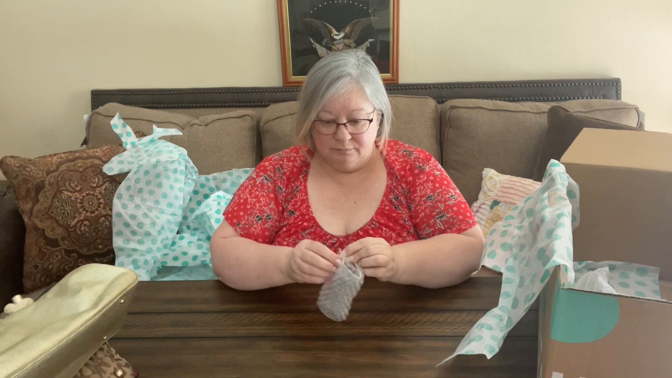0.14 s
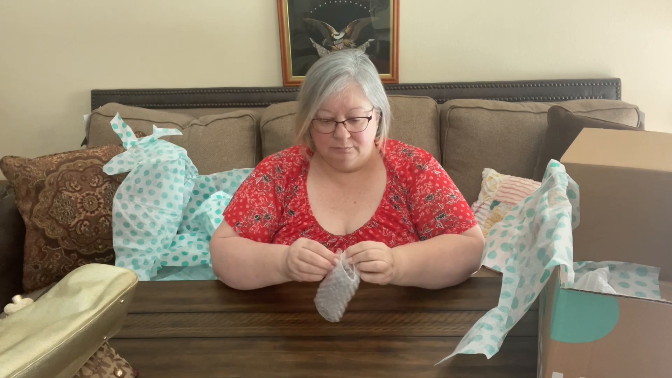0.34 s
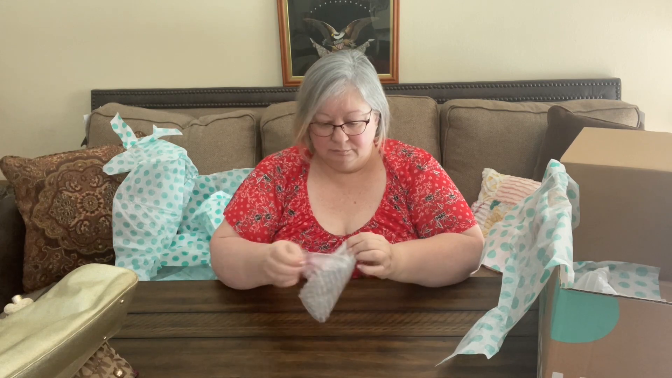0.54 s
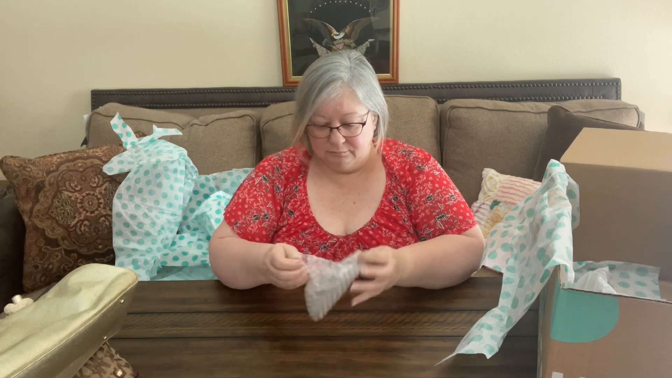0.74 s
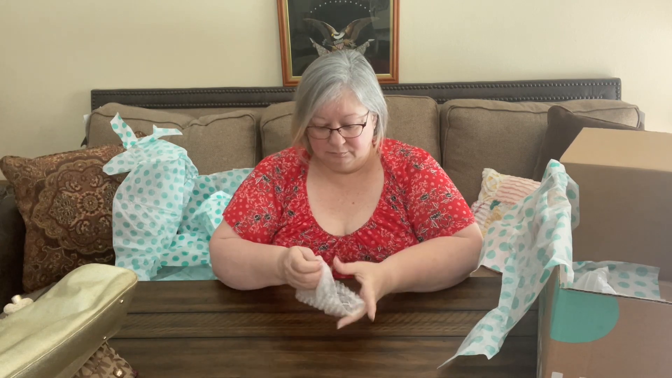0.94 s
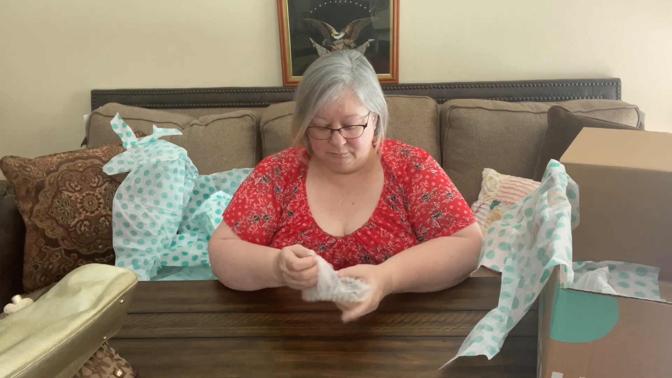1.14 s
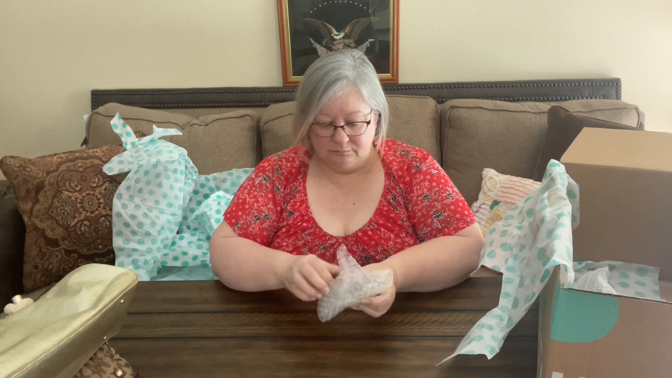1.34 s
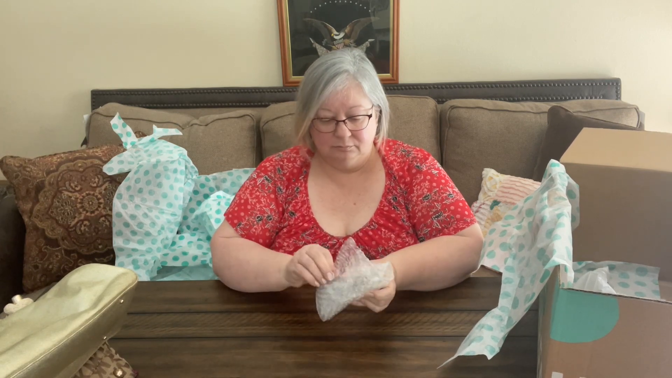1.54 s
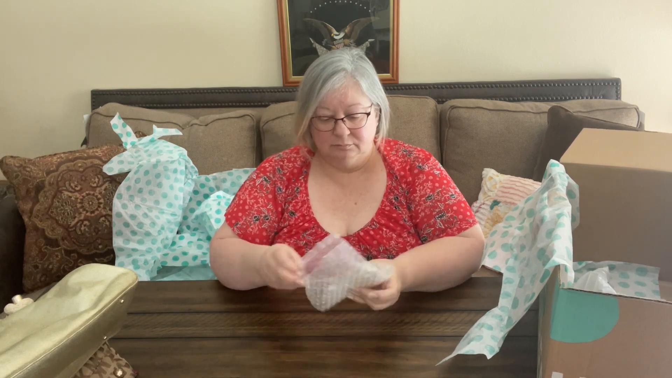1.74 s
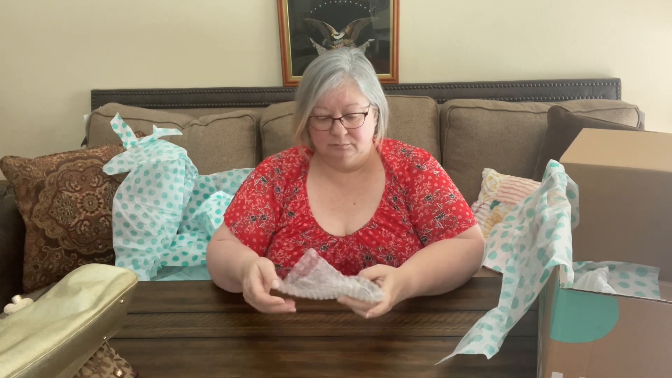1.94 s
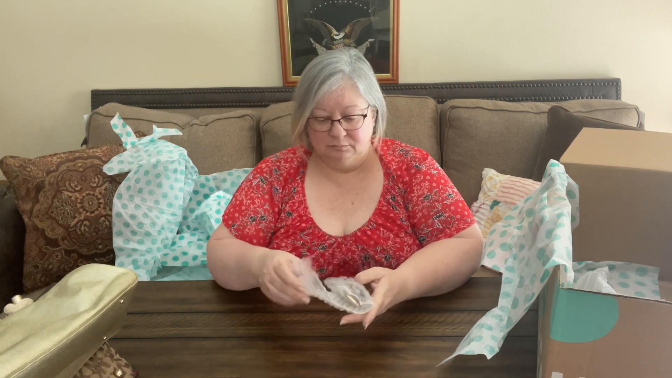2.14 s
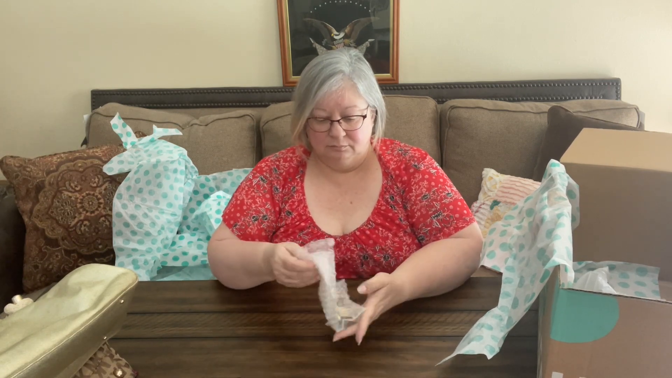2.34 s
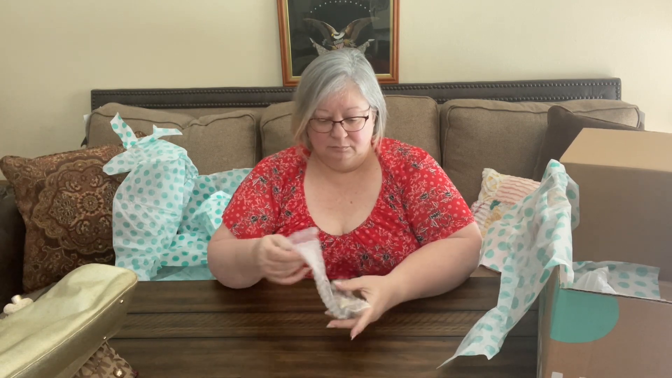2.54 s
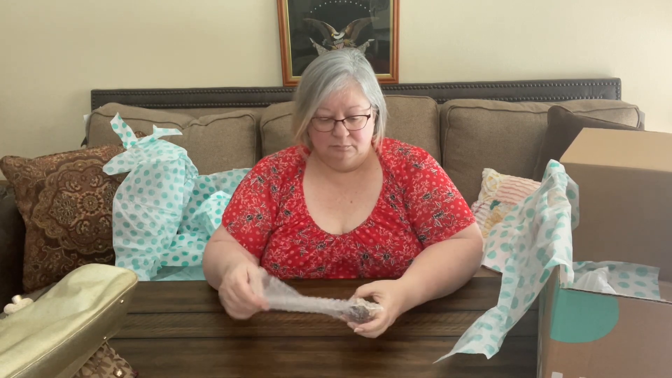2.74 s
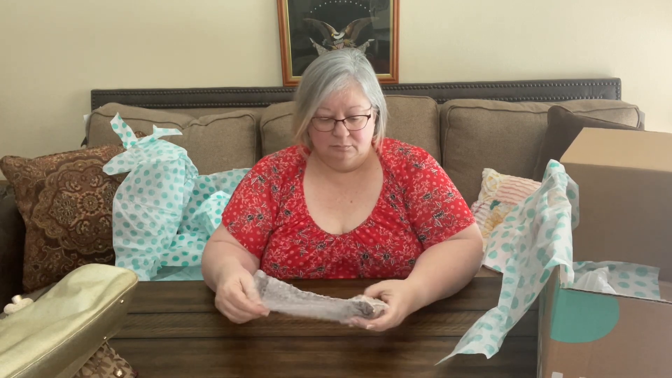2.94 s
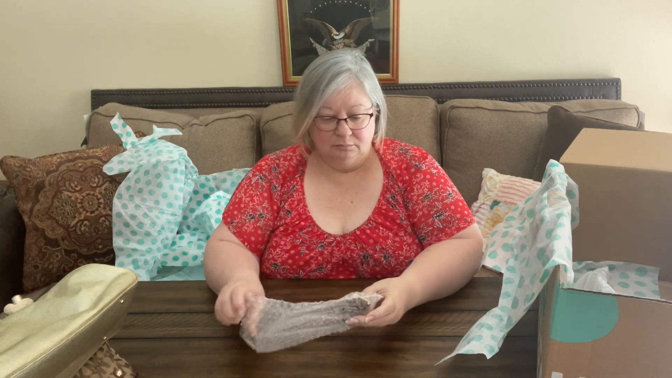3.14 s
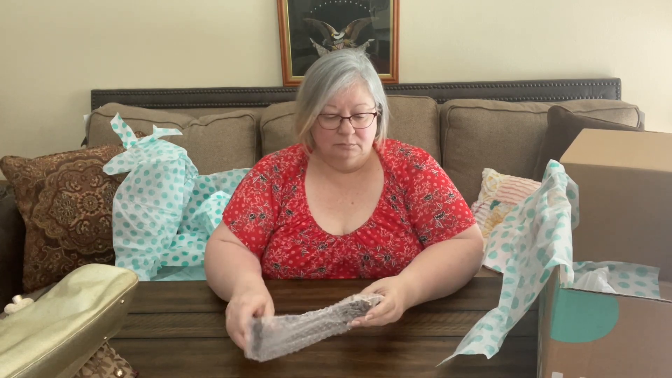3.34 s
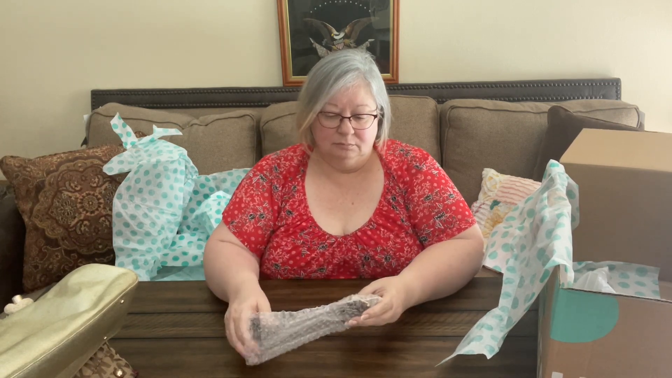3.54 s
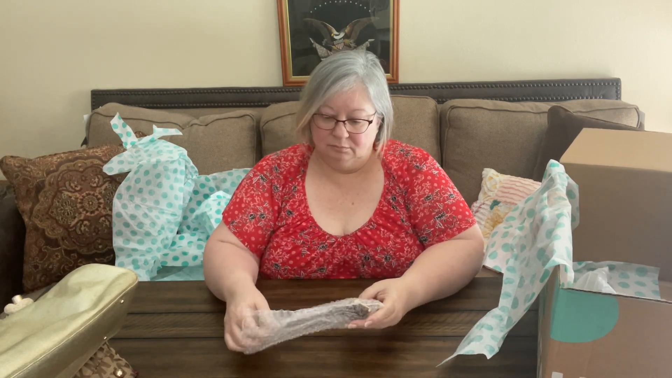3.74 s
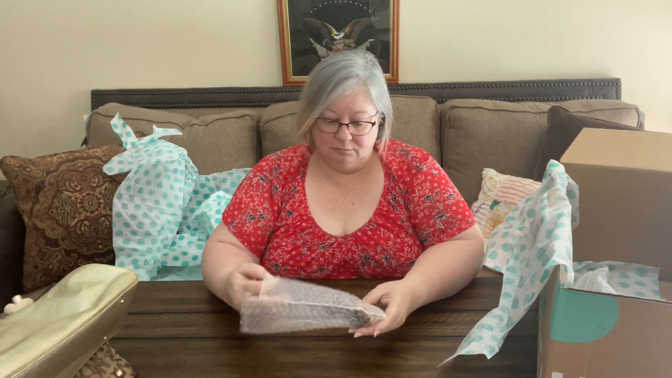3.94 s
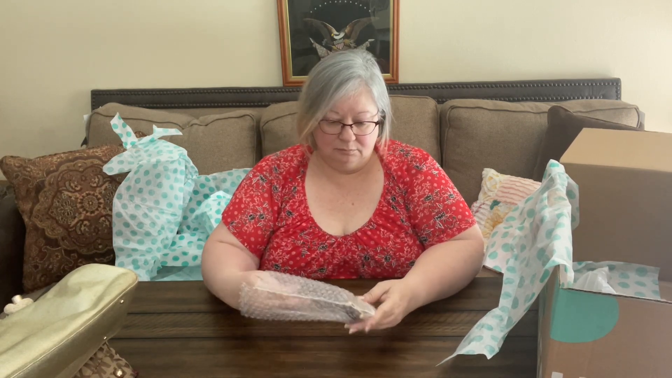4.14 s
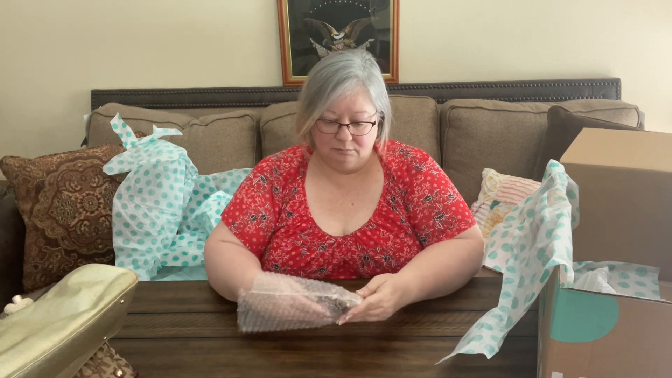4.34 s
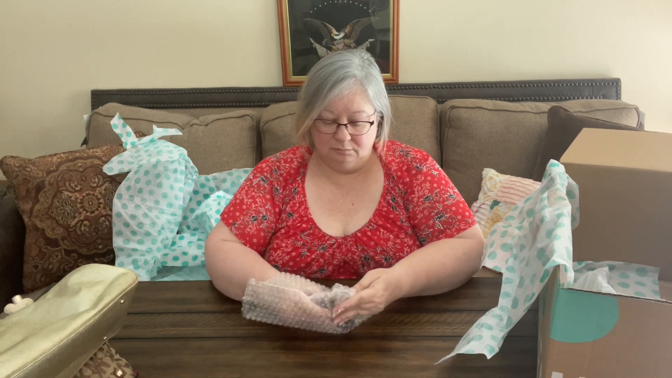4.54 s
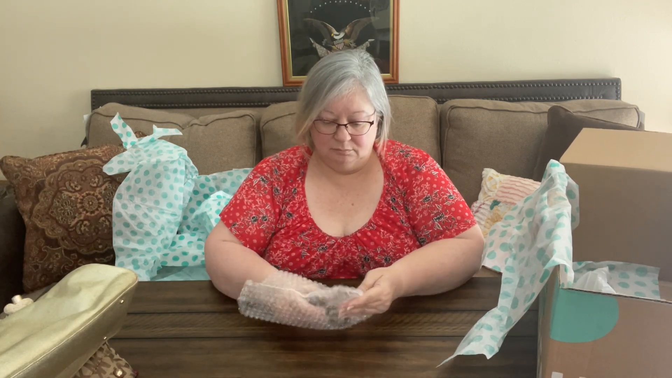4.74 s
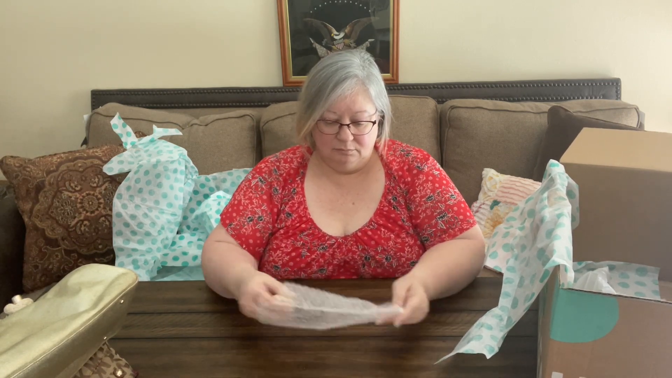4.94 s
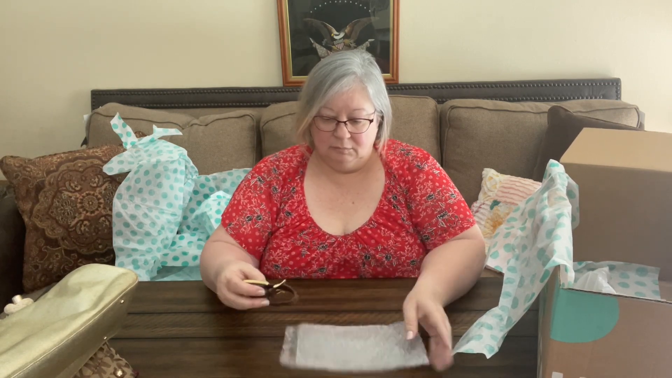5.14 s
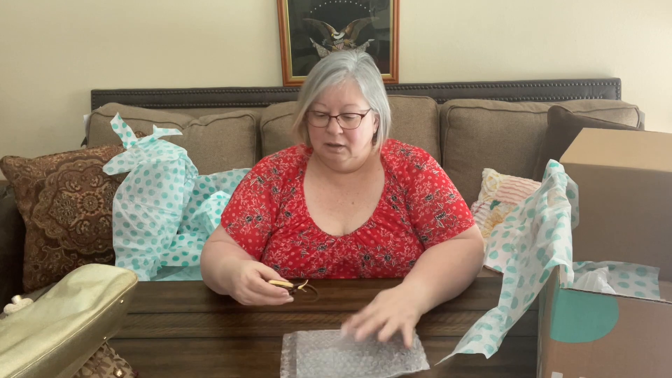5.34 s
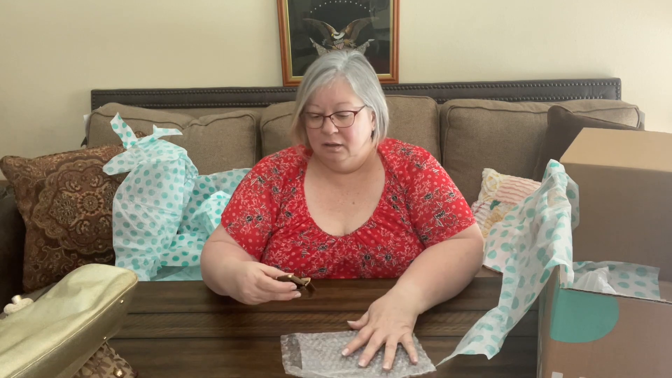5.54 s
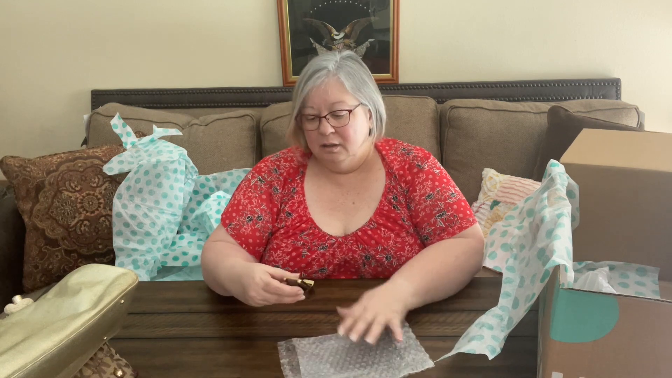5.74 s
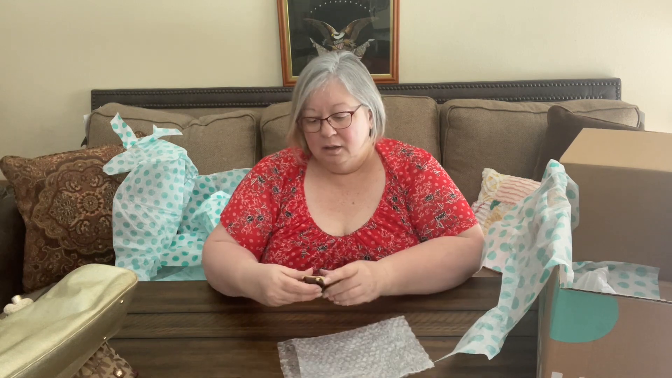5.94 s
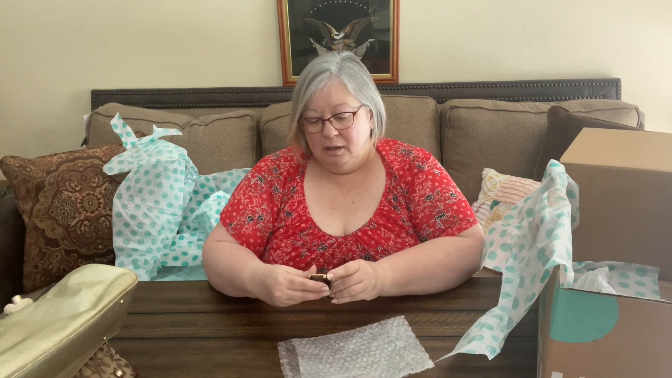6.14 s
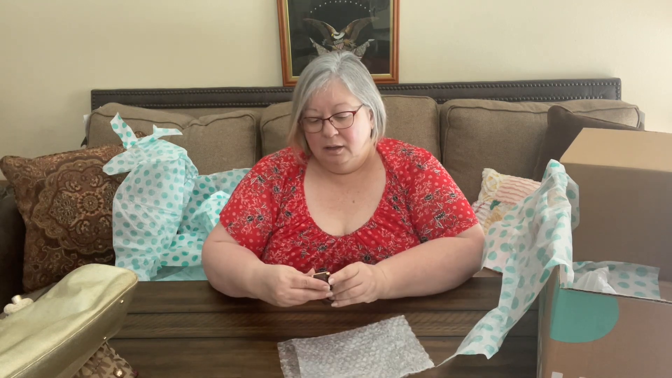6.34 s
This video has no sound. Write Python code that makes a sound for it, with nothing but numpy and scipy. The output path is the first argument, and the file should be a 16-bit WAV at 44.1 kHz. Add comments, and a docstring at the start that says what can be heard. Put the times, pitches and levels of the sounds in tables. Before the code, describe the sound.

Bubble wrap crinkles and crackles busily in hands, with sharp early snaps, then is slapped flat on a wooden table and falls quiet.

```python
"""A small bubble-wrap pouch is pulled open, crinkled and patted flat by hands on a wooden table in a furnished room.
Creases in the film buckle as dense tiny clicks, each ringing a short resonance; lone creases pop across the band.
Larger folds snap as click sprays that ring the air pockets; the pat rings modes of table top and trapped air.
Two close microphone ports hear a common sound and reflections of their own over a faint mains hum, made as
narrow bands of noise, and a faint hiss of coloured noise."""
import sys
import numpy as np
from scipy import signal
from scipy.fft import rfft, irfft, next_fast_len
from scipy.io import wavfile
from scipy.ndimage import uniform_filter1d

SR = 44100
rng = np.random.default_rng(int(sys.argv[2]) if len(sys.argv) > 2 else 0)


def generate_wav(signal):
    """Clip the signal to [-1, 1] and save it as 16-bit WAV at the path in sys.argv[1]."""
    frames = np.transpose(np.atleast_2d(signal))
    scaled = np.clip(frames, -1, 1) * 32767
    pcm = np.round(scaled).astype(np.int16)
    wavfile.write(sys.argv[1], SR, pcm)


N = 286120
SIZE = next_fast_len(N + SR)   # FFT length, with room for the echoes
HZ = np.maximum(np.arange(SIZE // 2 + 1) * SR / SIZE, 1)


def crinkle():
    """Buckling: fine creases crackle and sizzle, wide folds rustle lower; a firmer grip makes the grain coarser."""
    # Spectra of the fine crackle, its sizzling top and the wide folds.
    # Each row: frequency in Hz, relative density in dB per Hz.
    film_spectrum = [(530, -26.5), (900, -8.5), (2400, -1), (2830, -4), (4370, -1), (5830, -7.5),
                     (9000, -24), (11700, -22.5), (19800, -120)]
    sizzle_spectrum = [(4000, -17.5), (7000, -0.5), (9000, -2.5), (12000, -6), (16000, -10.5)]
    folds_spectrum = [(71, -18.5), (120, -9.5), (178, -8.5), (433, 0), (485, -1), (543, -2), (841, -5.5),
                      (1080, -5), (3500, -11.5), (4550, -37), (7700, -120)]
    slap_s, settling_grip = 5.3, .55   # once slapped flat the sheet settles with a fine grain

    film_gain, folds_gain, sizzle_gain = handling()
    grip = np.clip((20 * np.log10(film_gain) + 71) / 25, .2, 1)
    grip = np.where(np.arange(N) / SR < slap_s, grip, settling_grip)
    jerks = from_db(0.2 * grip * drift(26))   # the whole sheet gives way in small jerks
    film = creases(film_spectrum, per_s=6000, spread_db=3.2 * grip, clump_db=1.5, clump_hz=40, cycles=2.5)
    sizzle = creases(sizzle_spectrum, per_s=19000, spread_db=3.2 * grip,
                     clump_db=1.5, clump_hz=25.2, cycles=16.0, count=5)
    folds = creases(folds_spectrum, per_s=800, spread_db=1.3 * grip, clump_db=0.5, clump_hz=29.0, cycles=5.6)
    crackle = film_gain * (film + grip * ticks())
    return jerks * (crackle + sizzle_gain * sizzle + folds_gain * folds)


def handling():
    """Addition of power: squeezes rise, hold and let go over the resting rustle; gains of crackle, folds, sizzle."""
    # Pulls and squeezes of the wrap. Each row: time at full strength in seconds, hold in seconds,
    # film crackle in dB, fold rustle in dB relative to the crackle.
    squeezes = [(-0.007, 0.13, -55.5, -7), (0.114, 0.13, -52.5, -3.5), (0.289, 0.015, -53.5, -13),
                (0.413, 0.041, -47.5, -24), (0.466, 0.011, -44, 1.5), (0.508, 0.01, -39.5, 6),
                (0.549, 0.011, -37, -3), (0.628, 0.058, -62, 10.5), (0.779, 0.11, -49.5, -4),
                (0.962, 0.029, -52, -4.5), (1.03, 0.052, -58, 0.5), (1.105, 0.13, -48.5, -4),
                (1.314, 0.025, -51.5, -2.5), (1.391, 0.019, -50.5, -10), (1.449, 0.019, -49, -6),
                (1.529, 0.11, -43, 0.5), (1.628, 0.011, -45, 5.5), (1.696, 0.026, -49.5, -3),
                (1.763, 0.037, -45.5, -5.5), (1.848, 0.042, -50, -1.5), (2.15, 0.023, -47, -6.5),
                (2.222, 0.028, -50.5, -3.5), (2.295, 0.015, -45, -5), (2.395, 0.013, -54, -3.5),
                (2.56, 0.16, -51, -9), (2.645, 0.13, -51, -2.5), (2.893, 0.057, -47.5, -4.5),
                (3.017, 0.041, -54, 1), (3.207, 0.016, -52.5, -7), (3.295, 0.023, -57, -5.5),
                (3.402, 0.016, -60.5, 6.5), (3.493, 0.0069, -52, -5), (3.55, 0.016, -61.5, 4),
                (3.625, 0.081, -52, -3.5), (3.748, 0.039, -51.5, -15), (3.854, 0.13, -45, -2.5),
                (4.09, 0.015, -52, 1.5), (4.218, .02, -53.5, -12), (4.278, 0.12, -46, -4),
                (4.463, 0.087, -48, 3), (4.665, 0.056, -59, 3), (4.741, 0.12, -45, -8.5),
                (4.916, 0.055, -53.5, -7.5), (5.036, 0.047, -53, -20), (5.156, 0.0083, -53, -18)]
    # Rustle between squeezes, then of the sheet slapped flat and settling on the table.
    # Each row: time in seconds, film crackle in dB, sizzle in dB relative to the crackle.
    resting = [(0.0, -48.5, 6), (0.1, -49.5, -11), (0.36, -60, 2), (0.7, -49.5, 1), (1.5, -57, -0.5),
               (2.05, -52.5, 0), (2.5, -53, 0.5), (3.15, -55.5, 1), (3.6, -63.5, -5.5), (4.6, -50, 1.5),
               (5.1, -58, 1.5), (5.33, -56, -2), (5.347, -49, 0), (5.356, -40.5, 1), (5.374, -33.5, 3),
               (5.39, -36.5, 0), (5.43, -42.5, -4), (5.55, -52, -7), (5.72, -58, -2.5), (5.85, -68, 4),
               (6.03, -74, 2), (6.15, -84, 0), (6.49, -95, -14)]
    rise_db_per_s, fall_db_per_s = 267.5, 150.5
    squeeze_sizzle_db = 0.93   # relative to the crackle
    # The resting folds rustle less once the sheet leaves the hands; dB relative to the resting crackle
    let_go_s, held_folds_db, lying_folds_db = 5.2, -10, -17.5

    t = np.arange(N) / SR
    rest_db, rest_sizzle_db = in_time(resting)
    rest = from_db(rest_db)
    film = 0
    folds = rest * from_db(np.where(t < let_go_s, held_folds_db, lying_folds_db))
    for s, hold, db, folds_db in squeezes:
        rise_db = rise_db_per_s * np.clip(s - t, 0, 1)
        fall_db = fall_db_per_s * np.clip(t - s - hold, 0, 1)
        swell = from_db(db - rise_db - fall_db)
        film = np.hypot(film, swell)
        folds = np.hypot(folds, swell * from_db(folds_db))
    sizzle = np.hypot(film * from_db(squeeze_sizzle_db), rest * from_db(rest_sizzle_db))
    return np.hypot(film, rest), folds, sizzle


def creases(spectrum, per_s, spread_db, clump_db, clump_hz, cycles, count=8):
    """Impulse excitation: creases buckle in random clumps, each briefly ringing one of a few pitches, each
    pitch with reflections of its own; rms 1."""
    wander_db, wander_hz = 2.6, 5.5   # as the hands move, each pitch swells and fades by itself

    sizes = from_db(spread_db * np.minimum(rng.exponential(1, N), 4.0)) * rng.choice([-1, 1], N)
    clicks = sizes * (rng.random(N) < per_s / SR) * from_db(clump_db * drift(clump_hz))
    dealt = rng.integers(0, count, N)   # the pitch that each crease rings
    heard = 0
    pitches = np.geomspace(spectrum[1][0], min(spectrum[-1][0], 14000), count)
    for k, hz in enumerate(pitches):
        wandering = clicks * (dealt == k) * from_db(wander_db * drift(wander_hz))
        heard = heard + ports(hz * ring(wandering, hz, cycles / hz))
    # Level out the sum of the pitches so that the table alone sets the broad spectrum
    even = uniform_filter1d(np.mean(np.abs(heard) ** 2, axis=0), size=2000)
    balance = np.abs(ports(np.ones(1), share=1.0))
    shaped = heard / np.sqrt(even) * balance * from_db(over_hz(spectrum))
    return rms_one(irfft(shaped, SIZE)[:, :N])


def ticks():
    """Shot noise: lone creases pop at random as short bright bursts of uneven size."""
    per_s, decay_ms = 120, 0.56
    level_db = -4.5   # relative to the crackle at full grip

    sizes = from_db(2.0 * np.minimum(rng.exponential(1, N), 3.0)) * (rng.random(N) < per_s / SR)
    envelope = signal.lfilter([1], [1, -np.exp(-1000 / (decay_ms * SR))], sizes)
    bursts = envelope * rng.standard_normal(N)
    bright = signal.sosfilt(signal.butter(1, [1800, 12000], "band", fs=SR, output="sos"), bursts)
    return from_db(level_db) * rms_one(irfft(ports(bright), SIZE)[:, :N])


def snaps(ring_cycles, count=6):
    """Resonance of a cavity: each fold snaps as a spray of clicks, a broad crack and a few cycles of an air pocket."""
    # Larger folds snapping. Each row: start in seconds, peak of the pocket ring in dB, ring in Hz,
    # peak of the bright crack in dB relative to the ring.
    folds_snapping = [(0.035, -34.5, 2000, 7), (0.039, -26, 1920, 1), (0.04, -19.5, 3600, -3),
                      (0.143, -36, 1880, 8), (0.156, -28, 4500, -0.5), (0.222, -34, 1280, 5.5),
                      (0.285, -29, 5030, 5.5), (0.286, -35, 1900, -7), (0.381, -57, 1700, 20),
                      (0.393, -45, 2380, 8), (0.41, -36.5, 2220, 3), (0.419, -17.5, 1380, -4),
                      (0.421, -31, 557, -20), (0.448, -21, 1720, -6), (0.454, -19.5, 1460, -3),
                      (0.455, -16.5, 4300, -1.5), (0.456, -31, 560, -18), (0.476, -19, 1410, -15),
                      (0.478, -26, 580, -19.5), (0.481, -13, 1960, -15), (0.505, -20.5, 1900, -5.5),
                      (0.507, -25, 1020, -15), (0.513, -37, 820, -12.5), (0.541, -19.5, 1500, -5),
                      (0.543, -21.5, 1200, -12), (0.555, -26.5, 1100, -6), (0.562, -41, 500, -14),
                      (0.577, -33.5, 1687, 0.5), (0.603, -34, 4500, 11), (0.74, -33, 1740, -1),
                      (0.8, -31.5, 1280, 1), (0.803, -32.5, 640, -12), (0.975, -52, 2880, 17),
                      (1.03, -42, 2150, 9), (1.156, -30, 2070, 2), (1.304, -43, 2040, 18),
                      (1.389, -44.5, 1990, 16), (1.458, -42, 1290, 10), (1.471, -36.5, 845, 11),
                      (1.512, -36.5, 1490, 3), (1.529, -21.5, 1150, 6), (1.538, -25, 1210, 2),
                      (1.559, -26.5, 11000, -12), (1.561, -14, 11200, -11.5), (1.564, -16, 7500, -2),
                      (1.592, -50, 447, -12), (1.61, -21.5, 5000, 1.5), (1.611, -23.5, 1230, -5),
                      (1.627, -21, 795, -12.5), (1.637, -26.5, 616, 1), (1.642, -33, 503, 5),
                      (2.115, -39, 2550, -1), (2.136, -50, 2020, 3), (2.297, -35, 1770, 4),
                      (2.302, -37, 1790, 8), (2.313, -38.5, 1790, 11), (2.488, -49, 1500, 10),
                      (2.576, -49.5, 1870, 19), (2.64, -39, 1980, 1), (2.664, -41, 530, -6),
                      (2.68, -46, 413, 16), (2.7, -42, 395, -6), (2.72, -38.5, 695, 12.5),
                      (2.77, -45, 415, 14), (2.839, -55, 1960, 24), (2.898, -46, 520, -3),
                      (2.945, -50, 400, -3), (3.024, -45, 566, 14), (3.04, -51, 620, 22),
                      (3.197, -53.5, 405, 21.5), (3.221, -39.5, 353, 5), (3.367, -46, 1050, -20),
                      (3.373, -42, 1000, -20), (3.379, -39, 880, -15), (3.504, -46, 1300, 3),
                      (3.551, -46.5, 940, 15.5), (3.618, -40, 1670, -4), (3.638, -53, 597, -2),
                      (3.848, -48, 510, 9), (3.882, -39.5, 320, 12), (4.071, -35.5, 2430, -8),
                      (4.09, -35.5, 780, -6), (4.101, -39, 990, -2), (4.262, -34.5, 880, -4),
                      (4.298, -45, 310, -10), (4.331, -34.5, 470, -9), (4.42, -39, 392, -10),
                      (4.467, -44, 400, -3), (4.481, -38, 680, 9), (4.488, -36.5, 426, -4),
                      (4.528, -33, 620, -6), (4.539, -36, 2600, 4), (4.661, -49, 1100, 20.5),
                      (4.681, -42, 400, -11), (4.735, -44.5, 2460, 21.5), (4.832, -34, 2420, 0),
                      (4.848, -39, 356, -8), (4.922, -46, 2120, 19.5), (4.936, -47, 2290, 15),
                      (5.255, -68, 2590, 4), (5.29, -56, 4060, 0), (5.336, -44, 2350, 12),
                      (5.355, -29.5, 1740, 0), (5.367, -33, 1960, 11), (5.373, -32.5, 1660, 19),
                      (5.38, -35.5, 870, 3), (5.391, -37, 900, 14), (6.024, -50, 7200, -5)]
    first_click = 7   # size of the opening click against the spray that follows
    spray_ms, low_stretch = 1.6, 0.8   # decay time at 1500 Hz; power by which lower snaps last longer
    crack_rise_ms, crack_fall_ms = 0.58, 0.64
    drier = .45   # portion of each port's own reflections that a snap makes common to both instead

    spots = np.zeros((count, N + 2000))
    ms = np.arange(2000) / SR * 1000
    spray = rng.standard_normal((len(folds_snapping), 2000))
    broad = signal.butter(1, [900, 10000], "band", fs=SR, output="sos")
    for k, (s, db, hz, crack_db) in enumerate(folds_snapping):
        decay = np.exp(-ms / spray_ms * (hz / 1500) ** low_stretch)
        burst = (spray[k] + first_click * (ms == 0)) * decay
        pocket = ring(np.diff(burst, prepend=0), hz, ring_cycles / hz)   # a small pocket radiates no bass
        swell = np.exp(-ms / crack_fall_ms) - np.exp(-ms / crack_rise_ms)
        crack = signal.sosfilt(broad, spray[k] * swell)
        snap = pocket / np.abs(pocket).max() + from_db(crack_db) * crack / np.abs(crack).max()
        spots[k % count, round(s * SR):][:2000] += from_db(db) * snap
    return sum(ports(spot[:N], drier=drier) for spot in spots)


def pat():
    """Modal excitation: soft pushes through the wrap set the table top and the trapped air ringing."""
    # Fingers, palm and small rebounds. Each row: start in seconds, push on the table in dB,
    # push on the air cushion in dB.
    touches = [(5.37, -39.5, -43), (5.377, -45.5, -31), (5.39, -39, -46.5), (5.42, -38, -44.5),
               (5.446, -45.5, -47), (5.474, -55, -52), (5.533, -66, -57.5)]
    # Modes of the table top, then of the air trapped under the palm.
    # Each row: frequency in Hz, level in dB relative to the push, t60 in seconds.
    table_modes = [(95.5, -3, 0.26), (122, -7.5, 0.24), (215, -12, 0.21)]
    cushion_modes = [(261, -10.5, 0.13), (325, -4.5, 0.13), (352, 1.5, 0.14), (424, -13, 0.17)]

    push = np.zeros((2, N))
    for s, *db in touches:
        push[:, round(s * SR)] = from_db(db)
    push = signal.lfilter(np.hanning(60) / 30, 1, push)   # soft contact of 60 samples
    thump = 0
    for x, modes in zip(push, (table_modes, cushion_modes)):
        for hz, db, t60 in modes:
            thump = thump + from_db(db) * ring(x, hz, t60)
    return thump


def hum(own):
    """Narrow-band noise: a few low resonances carry the mains hum, mostly alike at both ports."""
    # Resonances of the hum. Each row: frequency in Hz, width in Hz, relative level in dB.
    resonances = [(57.7, 7.8, -5.5), (98.1, 5, -7), (120.8, 4.3, -6)]
    # Course of the hum, averaged over the ports in dB. Each row: time in seconds, level in dB.
    course = [(0.0, -69.5), (0.6, -62.5), (1.7, -64), (2.0, -67.5), (2.8, -65.5), (3.4, -69), (4.45, -64),
              (4.65, -69.5), (5.3, -77.5), (5.6, -70), (5.87, -75.5), (6.49, -83.5)]

    lines = 0
    for hz, width, db in resonances:
        noise = rng.standard_normal(N) + own * rng.standard_normal((2, N))
        lines = lines + from_db(db) * rms_one(ring(noise, hz, 2.2 / width))   # t60 is 2.2 / bandwidth
    return from_db(in_time(course)[0]) * rms_one(lines) * from_db([[-1.5], [1.5]])


def port_hiss():
    """Uncorrelated noise: each port adds a faint coloured hiss of its own."""
    # Spectrum of the hiss. Each row: frequency in Hz, relative density in dB per Hz.
    hiss_spectrum = [(76, -36), (130, -5.5), (351, -14), (454, -14), (875, -19), (1790, -16), (5000, -25),
                     (15000, -31)]
    return from_db(-80) * coloured(rng.standard_normal((2, N)), hiss_spectrum)


def ports(x, share=None, drier=0):
    """Partial correlation: spectra of a common, phase-shifted sound and each port's own reflections."""
    # Phase between the ports. Each row: frequency in Hz, lead of the left in radians.
    port_phase = [(0, 0), (2000, -.45), (4200, -2.4), (5500, -1.5), (6300, -3.6), (7500, -4.2),
                  (8900, -3.14), (11700, 0), (14450, 3.14), (16000, 4.9)]
    # Likeness of the two channels. Each row: frequency in Hz, share of the power common to both from 0 to 1.
    common_share = [(50, .96), (300, .88), (700, .65), (1500, .62), (2800, .52), (4200, .62), (6000, .3),
                    (7500, .7), (8900, .99), (10200, .75), (11700, .995), (12700, .72), (14450, .99),
                    (16000, .6)]
    # Level balance of the ports. Each row: frequency in Hz, left minus right in dB.
    port_balance = [(60, 1), (240, -3), (950, -1.5), (3770, -1), (15000, 0)]
    # Hands and table top scatter at once, the room answers faintly
    scatter_t60_s, room_t60_s, room_db = 0.03, 0.25, -24

    t = np.arange(SR // 2) / SR
    decay = from_db(-60 * t / scatter_t60_s) + from_db(room_db - 60 * t / room_t60_s)
    echoes = rng.standard_normal((2, len(t))) * decay
    echoes = rfft(echoes / np.sqrt(np.sum(echoes ** 2, axis=1, keepdims=True)), SIZE)
    share = np.clip(over_hz(common_share), 0, 1) if share is None else share
    share = share + np.clip(drier, 0, 1) * (1 - share)   # a snap faces the ports more squarely
    lead = np.interp(HZ, *np.transpose(port_phase))
    common = np.sqrt(share) * np.exp(1j * lead * np.array([[0], [-1]]))
    balance = from_db(np.array([[.5], [-.5]]) * over_hz(port_balance))
    return rfft(x, SIZE) * (common + np.sqrt(1 - share) * echoes) * balance


def ring(x, hz, t60):
    """Damped oscillator: a unit click sets a decaying sine of starting height 1 ringing."""
    r, w = from_db(-60 / (t60 * SR)), 2 * np.pi * hz / SR
    return signal.lfilter([0, np.sin(w)], [1, -2 * r * np.cos(w), r * r], x + 1e-18)


def drift(rate):
    """Low-passed noise: slow chance with rms 1 and a corner near rate Hz."""
    r = np.exp(-2 * np.pi * rate / SR)
    return rms_one(signal.lfilter([1], [1, -2 * r, r * r], rng.standard_normal(N + SR))[SR:])


def coloured(x, spectrum):
    """Linear filtering: give white input a spectrum; rms 1."""
    return rms_one(irfft(rfft(x, SIZE) * from_db(over_hz(spectrum)), SIZE)[..., :N])


def over_hz(points):
    """Logarithmic pitch scale: read a table at every FFT bin, linear over log frequency."""
    hz, values = np.array(points).T
    return np.interp(np.log(HZ), np.log(hz), values)


def in_time(rows):
    """Linear interpolation: columns of a curve, one value a sample."""
    s, *columns = np.transpose(rows)
    return [np.interp(np.arange(N) / SR, s, c) for c in columns]


def rms_one(x):
    """Mean power: scale to rms 1."""
    return x / np.sqrt(np.mean(x ** 2) + 1e-20)


def from_db(db):
    """Decibel scale: amplitude gain of a level in dB."""
    return 10 ** (np.asarray(db) / 20)


def scene():
    """Superposition: the wrap, the table and the hum reach both ports; each adds its own hiss."""
    hiss = port_hiss()
    struck = irfft(snaps(ring_cycles=10.1) + ports(pat(), share=0.7), SIZE)[:, :N]
    return crinkle() + struck + hum(own=0.61) + hiss


def record(dry):
    """Band limiting: the deep bass below 45 Hz and the top above 15920 Hz are cut."""
    lean = signal.sosfilt(signal.butter(4, 45, "high", fs=SR, output="sos"), dry)
    return signal.sosfilt(signal.ellip(12, .5, 80, 15920, fs=SR, output="sos"), lean)


dry = scene()
out = record(dry)
generate_wav(out)
```